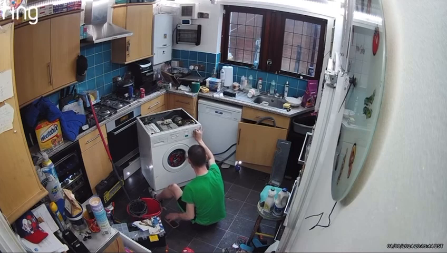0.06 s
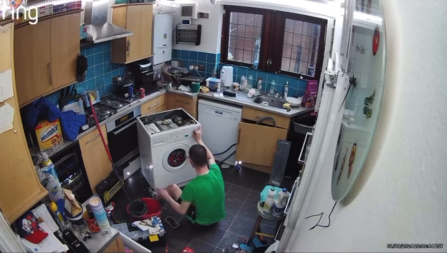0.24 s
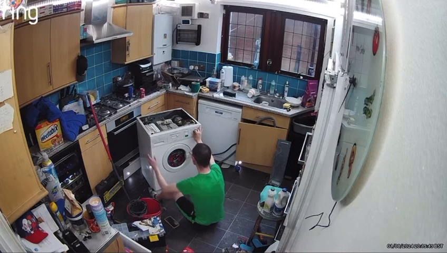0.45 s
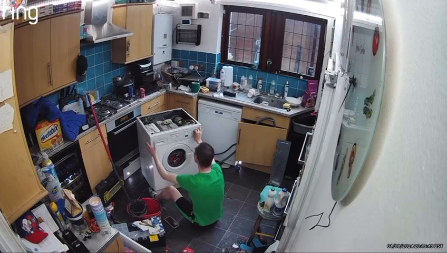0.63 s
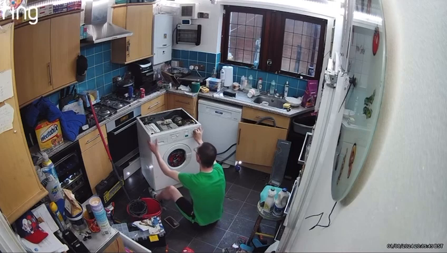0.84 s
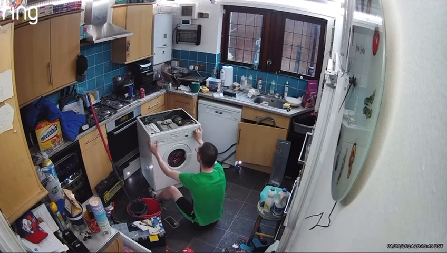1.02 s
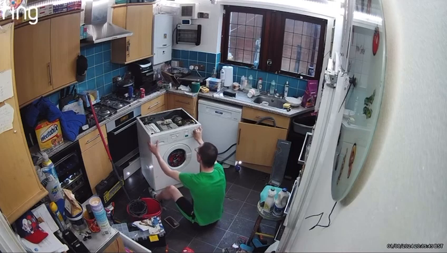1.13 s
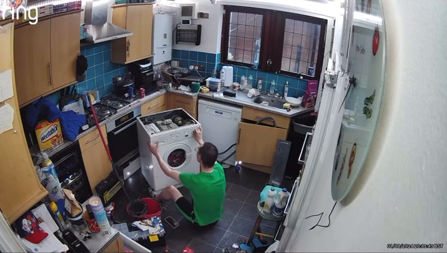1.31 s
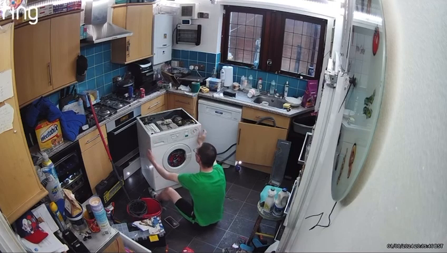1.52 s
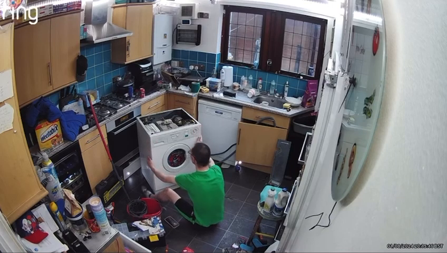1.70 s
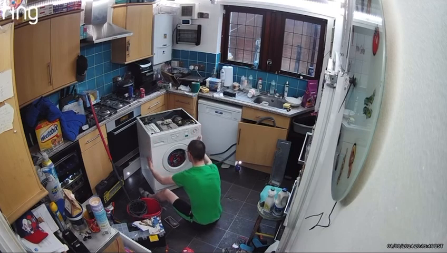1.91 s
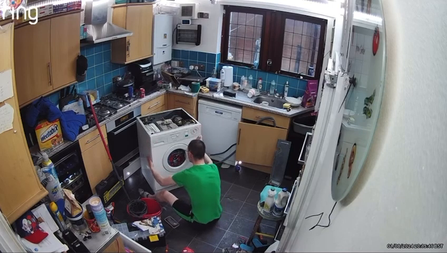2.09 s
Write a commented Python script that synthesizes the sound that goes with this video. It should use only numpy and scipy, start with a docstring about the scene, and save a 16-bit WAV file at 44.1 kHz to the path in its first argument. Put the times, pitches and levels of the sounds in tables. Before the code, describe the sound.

A washing machine clunks, thumps and rattles as someone walks it over kitchen tiles.

```python
"""A heavy washing machine is walked across the tiled floor of a small kitchen.
First it ticks and slides as it tips, and at 0.2 s it drops with a loud clunk. Then it rocks from foot
to foot, picking up speed: each landing thuds, rings the steel cabinet and clacks a loose part. In between,
the feet scuff and squeak and the drum bumps the frame. Towards the end it scrapes along the tiles."""
import sys
import numpy as np
from scipy.fft import rfft, irfft, next_fast_len
from scipy.io import wavfile
from scipy.ndimage import uniform_filter1d

SR = 44100
rng = np.random.default_rng(int(sys.argv[2]) if len(sys.argv) > 2 else 0)


def wav_record(signal):
    """Record a signal, one row per channel, as 16-bit PCM in the file named by sys.argv[1]."""
    frames = np.transpose(np.atleast_2d(signal))
    bounded = np.clip(frames, -1, 1)
    # unit amplitude maps onto the largest positive 16-bit level
    quanta = np.round(bounded * 32767).astype(np.int16)
    wavfile.write(sys.argv[1], SR, quanta)


N = 94815
T = np.arange(int(.6 * SR)) / SR  # seconds since one short sound began


def amp(db):
    """Turn decibels into a gain."""
    return 10 ** (np.asarray(db) / 20)


def unit(x):
    """Scale to an average (rms) level of 1."""
    return x / np.sqrt(np.mean(x ** 2) + 1e-20)


def noise(colour, size=len(T)):
    """Noise with a colour: rows of frequency in Hz and strength in dB."""
    hz, db = np.transpose(colour)
    f = np.fft.rfftfreq(size, 1 / SR)
    gain = amp(np.interp(np.log(f + 1), np.log(hz), db))
    return unit(irfft(rfft(rng.standard_normal(size)) * gain, size))


def band(hz, width):
    """Noise gathered around one pitch; width is roughly a fraction of that pitch."""
    steps = np.arange(-6, 7)
    colour = np.column_stack([hz * np.exp(width * steps), -20 * np.log10(1 + steps ** 2)])
    return noise(np.vstack([(hz * np.exp(-9 * width), -70), colour]))


def swell(rise_s, fade_s):
    """Rise to 1, then die away. The fade time is how long a fall of 60 dB takes."""
    shape = (1 - np.exp(-T / rise_s)) * np.exp(-np.log(1000) * T / fade_s)
    return shape / shape.max()


def ring(tones, rise_s, scatter_db, detune):
    """The tones of a struck object, a little different at every blow."""
    out = np.zeros(len(T))
    for hz, db, fade_s in tones:
        louder, higher, phase = rng.standard_normal(3)
        wave = np.sin(2 * np.pi * (hz * (1 + detune * higher) * T + phase))
        out += amp(db + scatter_db * louder) * swell(rise_s, fade_s) * wave
    return out


def bloom(tones, peak_s):
    """Tones that build up in the room and die quickly, leaving a faint tail."""
    age = T / peak_s
    shape = age * np.exp((1 - age ** 2) / 2) + amp(-16) * swell(.0019, .26)
    return shape * sum(amp(db) * np.sin(2 * np.pi * (hz * T + rng.random())) for hz, db in tones)


def add(track, s, sound):
    """Mix a sound in at s seconds."""
    i = max(round(s * SR), 0)
    track[i:i + len(sound)] += sound[:max(N - i, 0)]


# The kitchen's background. Each row: frequency in Hz, strength in dB.
ROOM_COLOUR = [(25,-23.5), (60,-39.5), (260,-14), (400,-18), (1370,-34), (5180,-32), (8000,-45),
               (10400,-84.5)]

def room():
    """The faint, steady noise of a quiet kitchen."""
    return amp(-74) * noise(ROOM_COLOUR, N)


# Feet settling. Each row: start in seconds, level in dB.
FOOT_SCUFFS = [(0.512,-67), (0.728,-65), (0.931,-69), (1.099,-56.5), (1.838,-62.5), (1.318,-66),
               (1.49,-60.5)]
# Their rustle. Each row: frequency in Hz, strength in dB.
RUSTLE_COLOUR = [(1200,0), (2800,-5), (5600,-7), (8000,-31.5)]

def scuffs():
    """A foot rustles softly as it settles on the tiles."""
    out = np.zeros(N)
    for s, db in FOOT_SCUFFS:
        add(out, s, amp(db) * noise(RUSTLE_COLOUR) * swell(.014, .29))
    return out


# Feet twisting. Each row: start in seconds, level in dB, pitch in Hz.
FOOT_SQUEAKS = [(0.511,-73,5180), (1.1,-66,4970), (1.316,-65,4760), (1.505,-60.5,5170)]

def squeaks():
    """A twisting foot rubs the tiles with a thin, rough chirp."""
    out = np.zeros(N)
    for s, db, hz in FOOT_SQUEAKS:
        add(out, s, amp(db) * band(hz, width=.05) * swell(.011, .2))
    return out


# Slides on the tiles. Each row: start in seconds, length in seconds, level in dB.
SLIDES = [(0.063, 0.14, -67.5), (0.17, 0.032, -49), (1.574, 0.076, -62.5), (1.721, 0.19, -60),
          (1.788, 0.068, -55.5), (1.893, 0.11, -57)]
# Their hiss. Each row: frequency in Hz, strength in dB.
SLIDE_COLOUR = [(300, 0.5), (1200, -12.5), (2500, -11), (3700, -0.5), (5000, -1.5), (6300, -3),
                (7200, -9.5), (8200, -22)]

def scrapes(rise_s=.032, fade_s=.26, grit_db=1):
    """Short slides make a gritty hiss that dies away in the room."""
    power = np.zeros(N)
    for s, length, db in SLIDES:
        rise = np.minimum(T / rise_s, 1)
        fall = np.exp(-np.log(1000) * np.maximum(T - length, 0) / fade_s)
        add(power, s, (amp(db) * rise * fall) ** 2)
    grit = amp(grit_db * unit(uniform_filter1d(rng.standard_normal(N), size=90)))
    return np.sqrt(power) * grit * noise(SLIDE_COLOUR, N)


# The drum meeting the frame. Each row: start in seconds, level in dB, pitch in Hz.
BUMPS = [(0.313,-45,150), (0.774,-53,178), (1.125,-49,199), (1.362,-49.5,181), (1.769,-52,182),
         (2.005,-58.5,117.5), (2.123,-51.5,251)]

def drum_bumps():
    """The drum swings on its springs and bumps the frame with a soft, low hum."""
    out = np.zeros(N)
    for s, db, hz in BUMPS:
        add(out, s, bloom([(hz, db)], peak_s=.018))
    return out


# Sharp ticks. Each row: start in seconds, click level in dB, push level in dB, click pitch in Hz.
TIPPING_TICKS = [(0.075, -61.5, -59, 5900), (0.139, -42, -45.5, 5930), (.168, -40.5, -41.5, 5300)]

def ticks():
    """The cabinet starts to tip: bright clicks, each with a small low push."""
    out = np.zeros(N)
    for s, click_db, push_db, hz in TIPPING_TICKS:
        click = band(hz, width=.097) * (swell(.0015, .021) + amp(-25) * swell(.0035, .16))
        push = noise(RUMBLE_COLOUR) * swell(.009, .048)  # the colours of a landing and of the drop, below
        push += amp(-7) * noise(TILE_CRACK_COLOUR) * swell(.00084, .11)
        add(out, s, amp(click_db) * click + amp(push_db) * push)
    return out


# The crack of hitting the tiles. Each row: frequency in Hz, strength in dB.
TILE_CRACK_COLOUR = [(40, -7.5), (100, 11.5), (450, 4), (800, -0.5), (1450, -8), (2600, 2.5), (3800, -5),
                     (5500, -3.5), (6800, -10), (8000, -38.5)]
# The floor's boom. Each row: pitch in Hz, level in dB.
FLOOR_TONES = [(86,-11), (113,1), (181,-3), (244,-1)]
# The cabinet's slam and rebounds. Each row: start in seconds, level in dB, pitch in Hz.
CABINET_SLAMS = [(0.2033, -27.5, 398.3), (.226, -29, 284.8), (0.248, -35, 303)]
# The tones of a slam. Each row: multiple of its pitch, level in dB, fade time in seconds.
SLAM_TONES = [(.84, -3.5, 0.073), (1, 5.5, 0.039), (1.139, -8, 0.18)]

def drop(start_s=.2025):
    """One hard drop: a bright crack, a boom in the floor, and the cabinet slamming and rebounding."""
    out = np.zeros(N)
    crack = noise(TILE_CRACK_COLOUR) * (swell(.0008, .022) + amp(-3.5) * swell(.0066, .23))
    boom = bloom(FLOOR_TONES, peak_s=.045)
    add(out, start_s, amp(-30) * crack + amp(-40.5) * boom)
    for s, db, hz in CABINET_SLAMS:
        for ratio, tone_db, fade_s in SLAM_TONES:
            add(out, s, amp(db + tone_db) * swell(.0058, fade_s) * np.sin(2 * np.pi * hz * ratio * T))
    return out


# The loose part's sharp ping. Each row: pitch in Hz, level in dB, fade time in seconds.
PING_TONES = [(2254,-6,0.014), (2531,1,0.015), (4670,-19,0.031)]
# The ping and its quick reflections from nearby surfaces. Each row: delay in seconds, level in dB.
EARLY_REFLECTIONS = [(0, -9.5), (.003, -8.5), (.0093, -9)]
# The part's longer ring. Each row: pitch in Hz, level in dB.
STEEL_TONES = [(1660,-11), (1771,-6), (1931,-4), (2212,-7), (2310,-1), (2440,0), (2613,-2), (2655,-3),
               (2837,-9), (3250,-15)]
# Its noise and echo. Each row: frequency in Hz, strength in dB.
STEEL_COLOUR = [(600,-51), (1400,-19), (1900,3.5), (2750,-13), (3300,-5.5), (4000,-16.5), (4900,-8.5),
                (6200,-31.5)]

def clack(db, echo):
    """A loose steel part pings once and rings; nearby surfaces reflect the ping and the room answers."""
    ping = ring(PING_TONES, rise_s=.0004, scatter_db=1, detune=.02)
    ping += amp(-13) * noise(STEEL_COLOUR) * swell(.0004, .024)
    snap = sum(amp(level) * np.interp(T - delay, T, ping, left=0) for delay, level in EARLY_REFLECTIONS)
    snap_db = 1.5 + min(.4 * (db + 44), 0)  # blows softer than -44 dB lose some snap
    tones = [(hz, level, .16) for hz, level in STEEL_TONES]  # all fade in 0.16 s
    steel = ring(tones, rise_s=.001, scatter_db=1.5, detune=.001)
    return amp(db) * (amp(snap_db) * snap + amp(-11.5) * steel + amp(-22) * echo * swell(.03, .17))


# The hollow base. Each row: pitch in Hz, level in dB, fade time in seconds.
BASE_TONES = [(566,-6,.12), (865.4,-1,0.065), (935,-3.5,.15), (960,-6,.15), (1098.4,-4.5,0.14)]
# A foot's knock. Each row: frequency in Hz, strength in dB.
KNOCK_COLOUR = [(250,-17), (450,-0.5), (750,-7.5), (1120,-6), (2200,-14.5), (5000,-40.5)]

def knock(db, echo):
    """A foot knocks on the tiles and rings the hollow base."""
    base = ring(BASE_TONES, rise_s=.04, scatter_db=1.5, detune=.005)
    base_db = -11.5 + min(.7 * (db + 47), 4)  # harder knocks ring more, up to a limit
    return amp(db) * (amp(-13.5) * echo * swell(.036, .29) + amp(base_db) * base)


# The frame and drum. Each row: pitch in Hz, level in dB.
FRAME_TONES = [(115.6,-7), (149.6,-5.5), (186,-5.5), (242.2,-3.5)]
# The noise in a thud. Each row: frequency in Hz, strength in dB.
RUMBLE_COLOUR = [(20,-8), (70,-13), (130,6), (260,-3.5), (700,-16.5), (1500,-72)]

def thud(db, centre_hz, width=.17):
    """The frame and drum thud; tones far from the centre pitch are up to 10 dB weaker."""
    tones = [(hz, level - min(4 * (np.log(hz / centre_hz) / width) ** 2, 10)) for hz, level in FRAME_TONES]
    rumble = noise(RUMBLE_COLOUR) * swell(.014, .22)
    return amp(db) * (bloom(tones, peak_s=.027) + amp(-12.5) * rumble)


def vary(echo, colour, same=.7):
    """Most of an echo repeats from landing to landing; the rest is new noise."""
    return np.sqrt(same) * echo + np.sqrt(1 - same) * noise(colour)


# The side panels. Each row: multiple of the panel pitch, level in dB.
PANEL_TONES = [(0.893,-14), (1,-1), (1.083,-8), (1.309,-16.5)]
# Feet landing. Each row: start in seconds, then clack, thud, panel and knock levels in dB,
# then the thud's centre pitch and the panel pitch in Hz.
FOOTFALLS = [(0.0788,-75,-47,-47,-53,125.6,335), (0.2797,-51,-38,-38.5,-47,118,335),
             (0.506,-58,-40.5,-43,-47.5,143,340), (0.7266,-58.5,-45,-46.5,-51.5,146,334.5),
             (0.9272,-47.5,-47,-42.5,-47,141,336.2), (1.0945,-51,-51.5,-45,-45,147,333),
             (1.2308,-40,-60.5,-49,-46,170,340.4), (1.3179,-58.5,-49,-47,-52,147,330),
             (1.3597,-50.5,-56.5,-60,-55,181,346.5), (1.46,-48.5,-55,-45,-43,183,367),
             (1.538,-27,-42,-36.5,-41.5,153,334.5), (1.585,-51,-64,-55,-61,150,335),
             (1.7323,-52.5,-51.5,-42,-47,150,333.3), (1.838,-45,-56,-47.5,-46,190,363.3),
             (1.9639,-46.5,-49.5,-45,-48.5,190,335), (2.098,-60.5,-55.5,-42.5,-44,125,335.7)]

def landings():
    """Each landing thuds, rings the side panels, knocks the base and clacks the loose part."""
    out = np.zeros(N)
    knock_echo, clack_echo = noise(KNOCK_COLOUR), noise(STEEL_COLOUR)
    for s, clack_db, thud_db, panel_db, knock_db, thud_hz, panel_hz in FOOTFALLS:
        add(out, s, thud(thud_db, thud_hz))
        panels = bloom([(panel_hz * ratio, db) for ratio, db in PANEL_TONES], peak_s=.03)
        add(out, s, amp(panel_db) * panels)
        add(out, s, knock(knock_db, vary(knock_echo, KNOCK_COLOUR)))
        add(out, s, clack(clack_db, vary(clack_echo, STEEL_COLOUR)))
    return out


def scene():
    """The machine over the kitchen's background, in one channel."""
    machine = ticks() + drop() + landings() + drum_bumps() + scrapes() + scuffs() + squeaks()
    return (machine + room())[None]


def record(dry):
    """The highest treble fades out, leaving nothing above 8600 Hz."""
    size = next_fast_len(N + SR // 2)
    f = np.fft.rfftfreq(size, 1 / SR)
    gain = np.clip((8600 - f) / 900, 0, 1) ** 2
    return irfft(rfft(dry, size) * gain, size)[:, :N]


dry = scene()
out = record(dry)
wav_record(out)
```